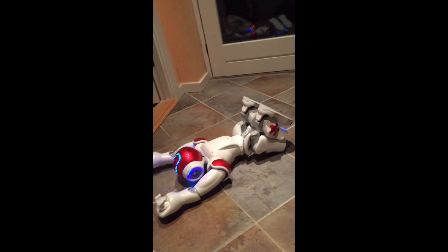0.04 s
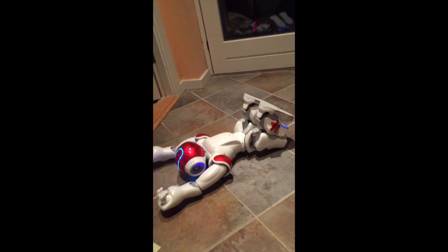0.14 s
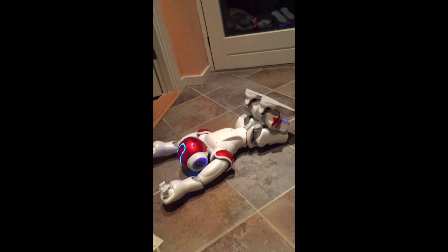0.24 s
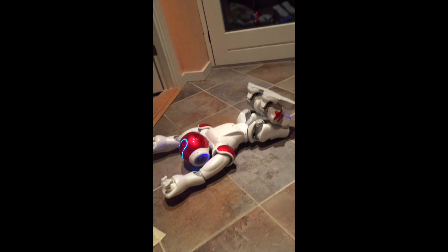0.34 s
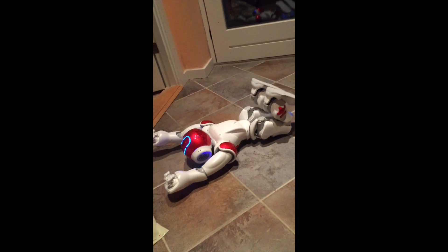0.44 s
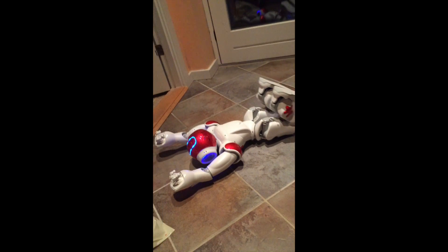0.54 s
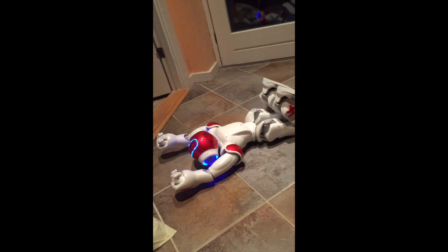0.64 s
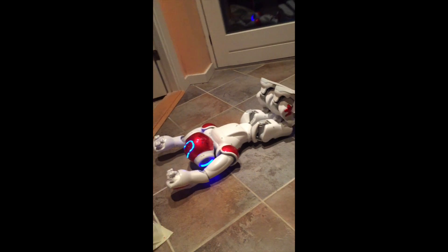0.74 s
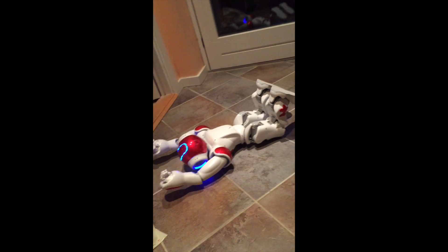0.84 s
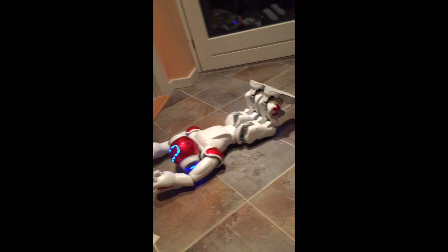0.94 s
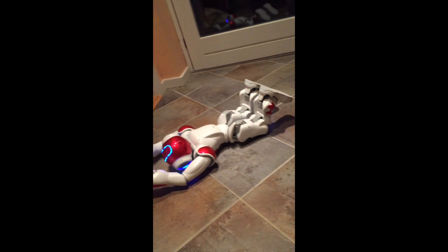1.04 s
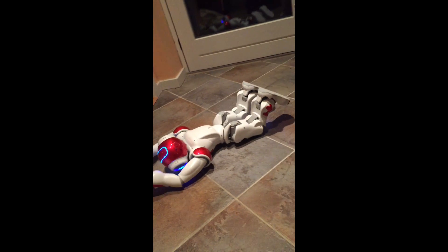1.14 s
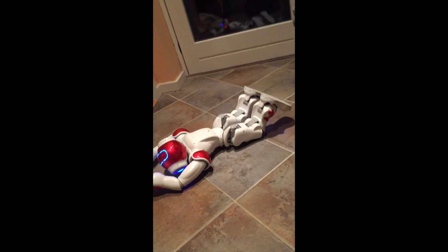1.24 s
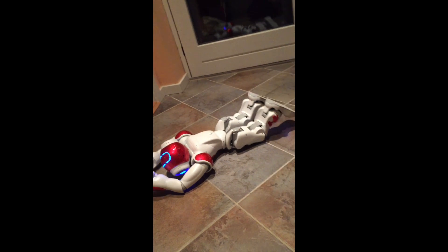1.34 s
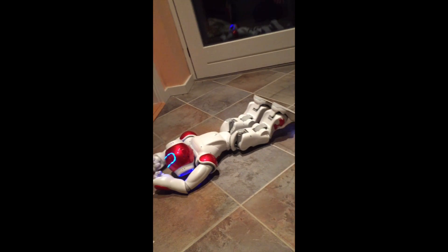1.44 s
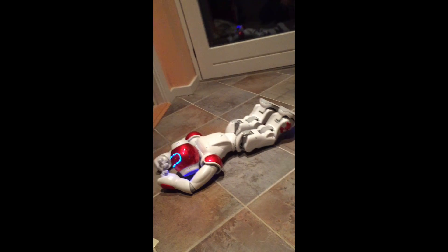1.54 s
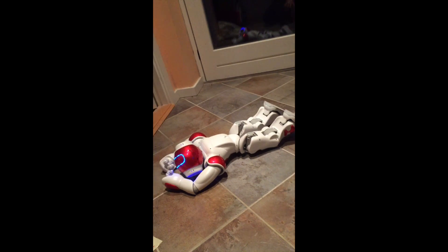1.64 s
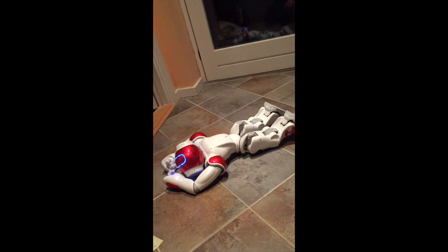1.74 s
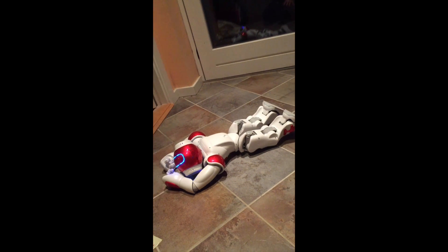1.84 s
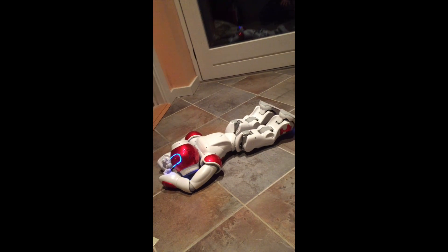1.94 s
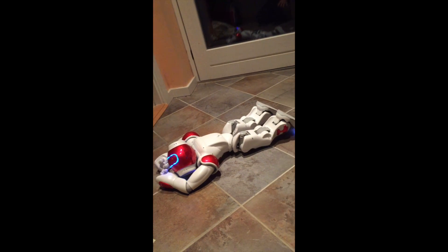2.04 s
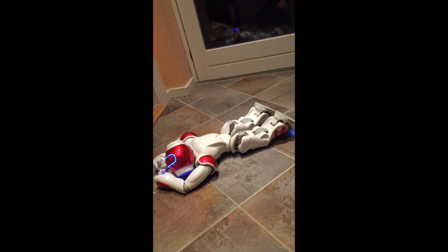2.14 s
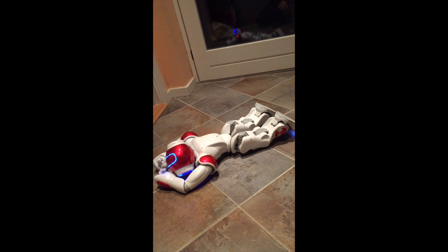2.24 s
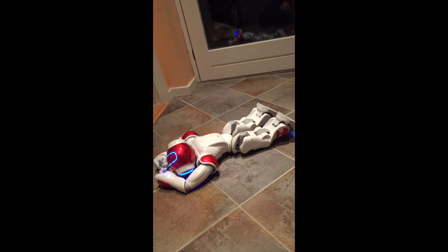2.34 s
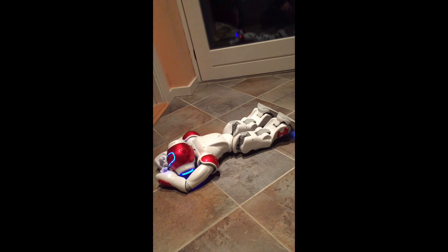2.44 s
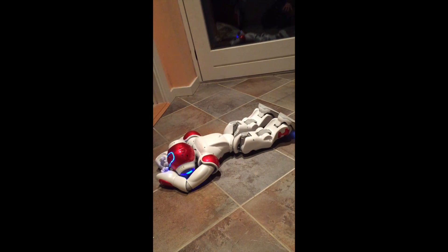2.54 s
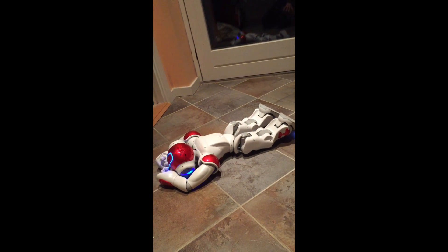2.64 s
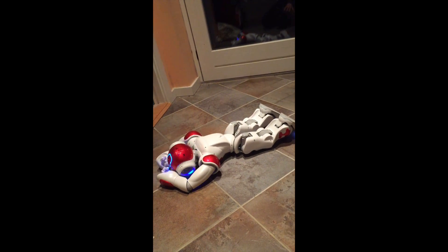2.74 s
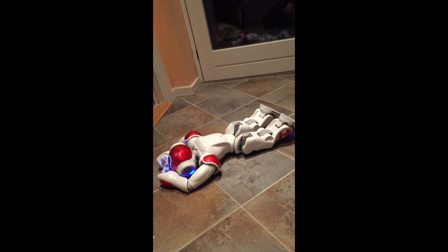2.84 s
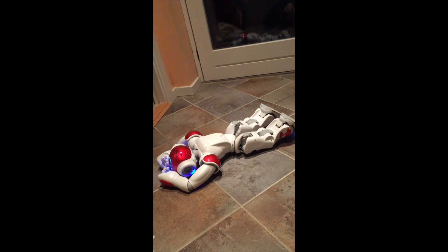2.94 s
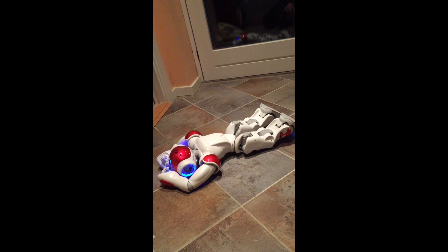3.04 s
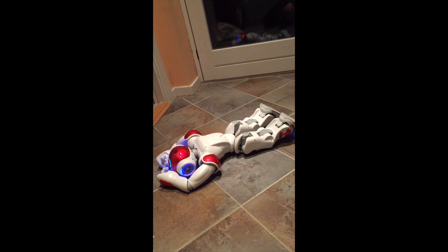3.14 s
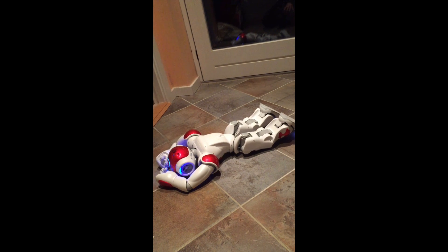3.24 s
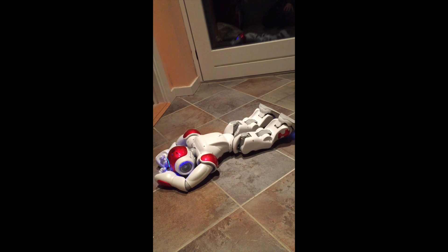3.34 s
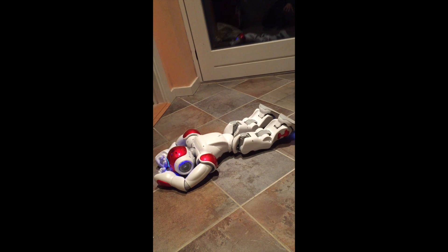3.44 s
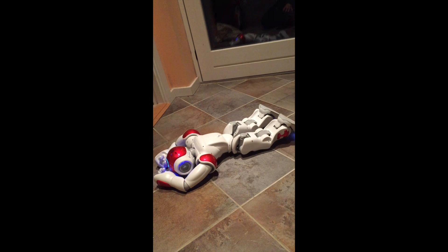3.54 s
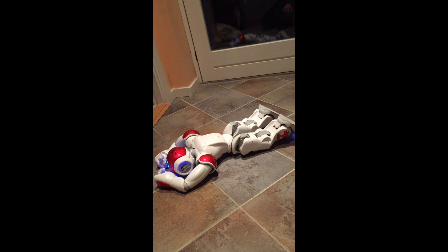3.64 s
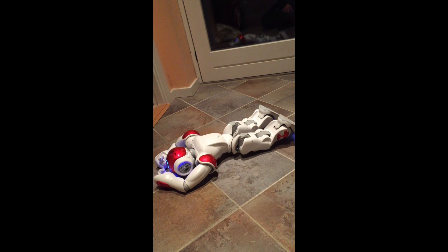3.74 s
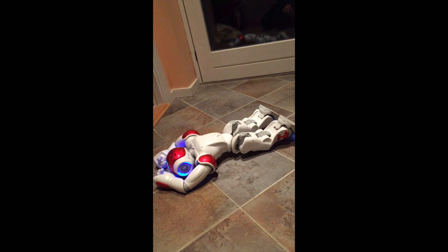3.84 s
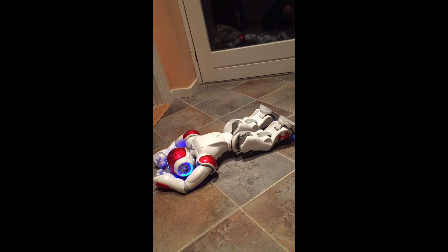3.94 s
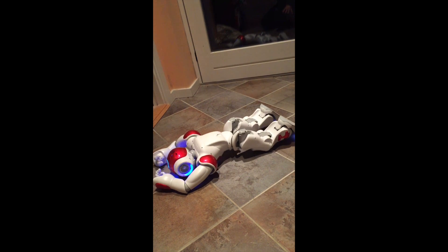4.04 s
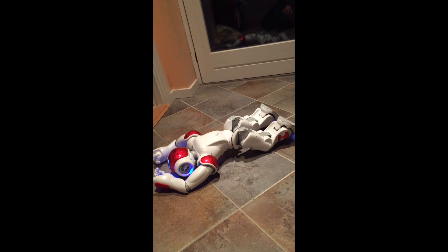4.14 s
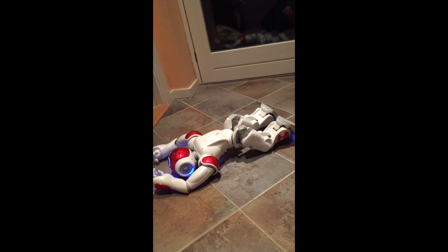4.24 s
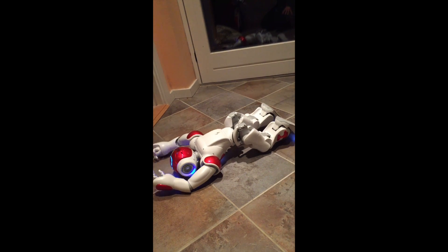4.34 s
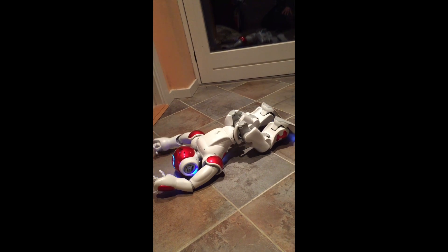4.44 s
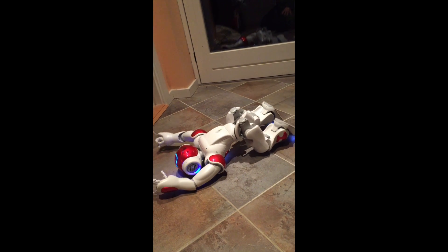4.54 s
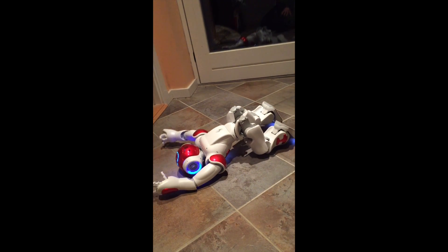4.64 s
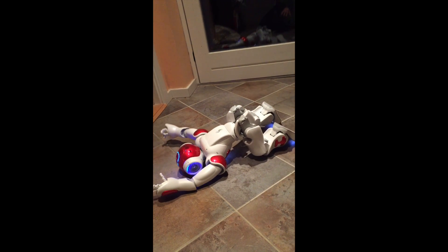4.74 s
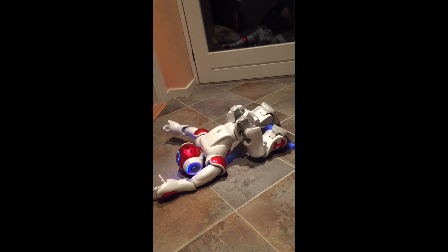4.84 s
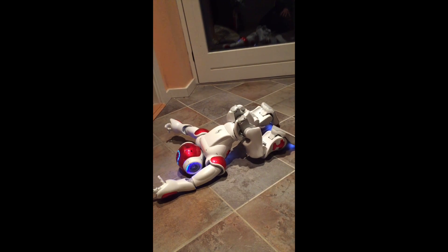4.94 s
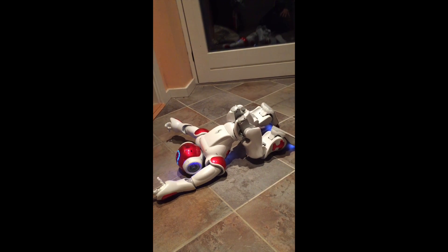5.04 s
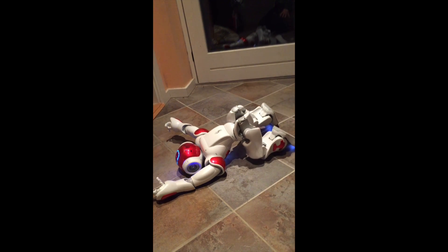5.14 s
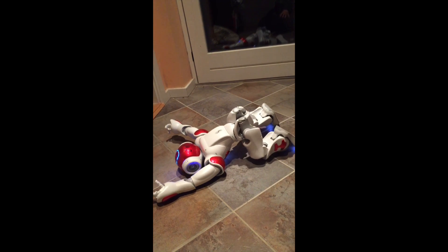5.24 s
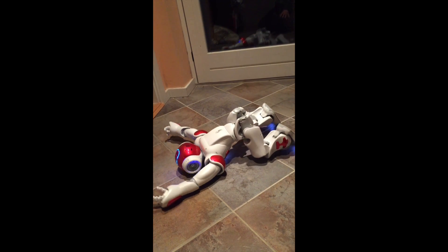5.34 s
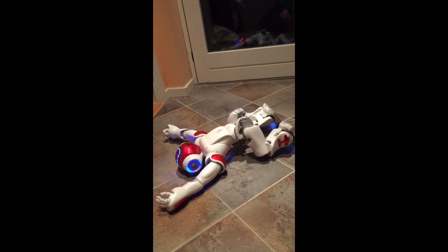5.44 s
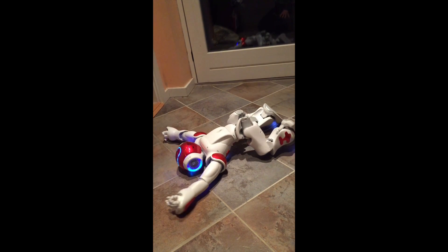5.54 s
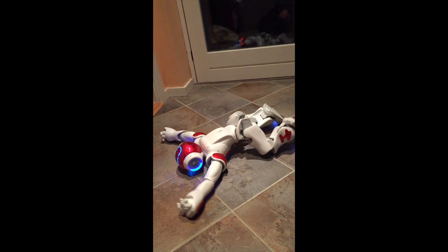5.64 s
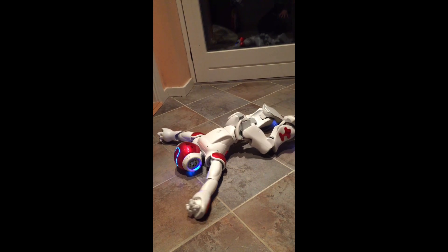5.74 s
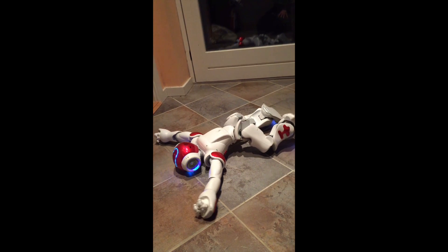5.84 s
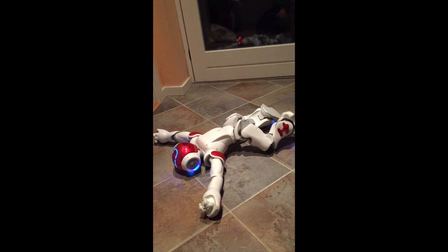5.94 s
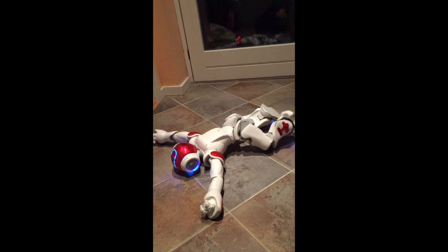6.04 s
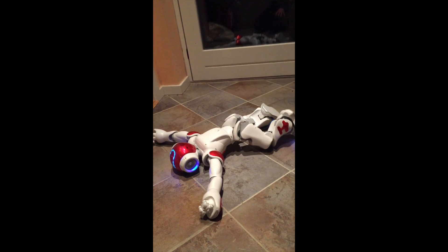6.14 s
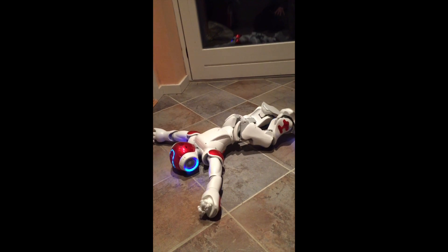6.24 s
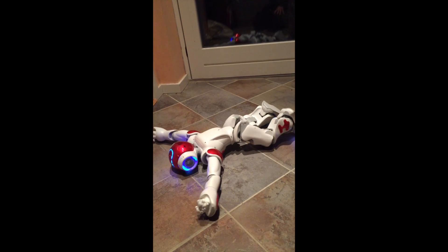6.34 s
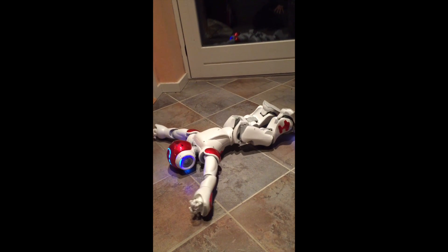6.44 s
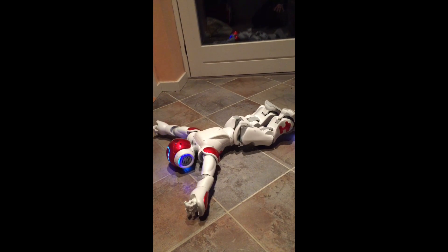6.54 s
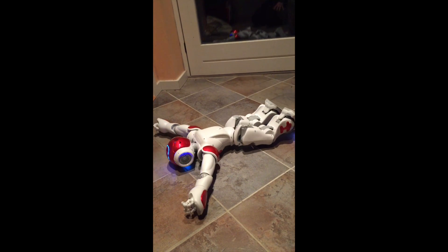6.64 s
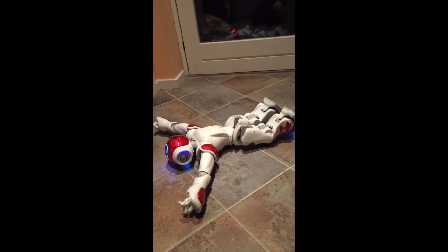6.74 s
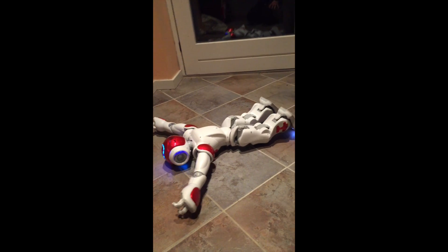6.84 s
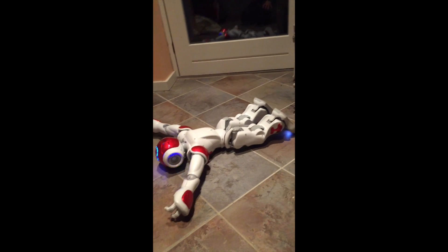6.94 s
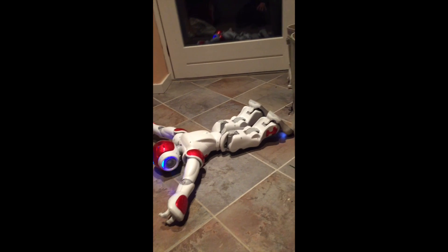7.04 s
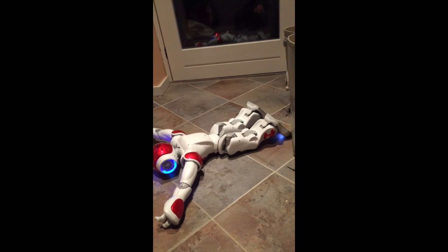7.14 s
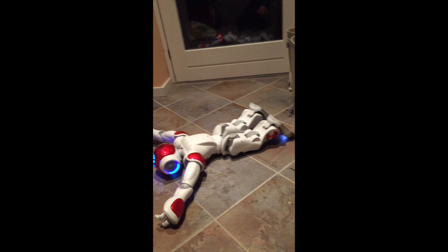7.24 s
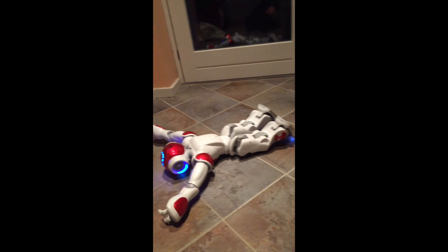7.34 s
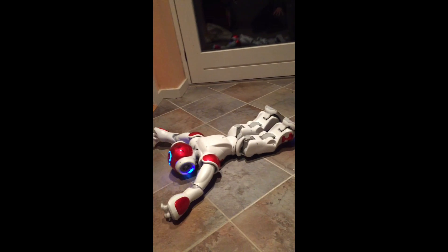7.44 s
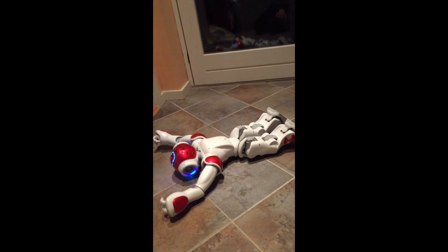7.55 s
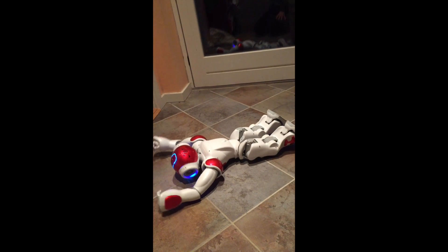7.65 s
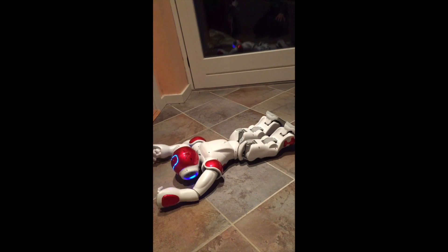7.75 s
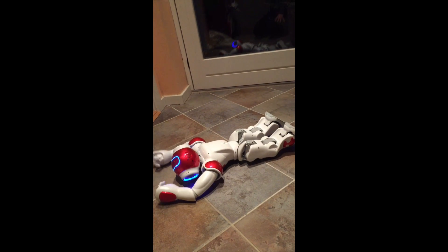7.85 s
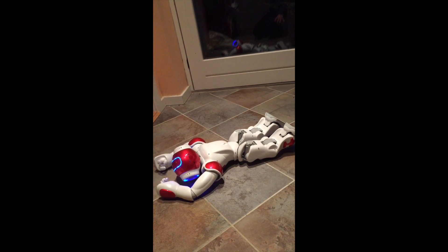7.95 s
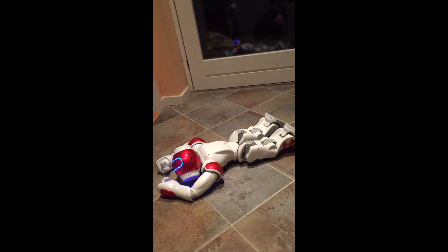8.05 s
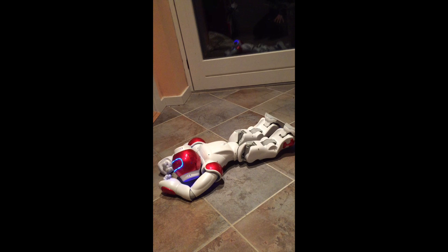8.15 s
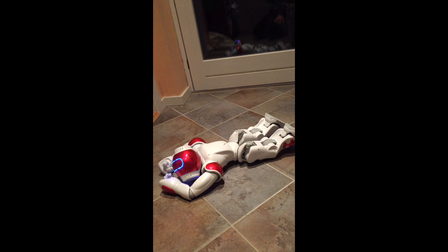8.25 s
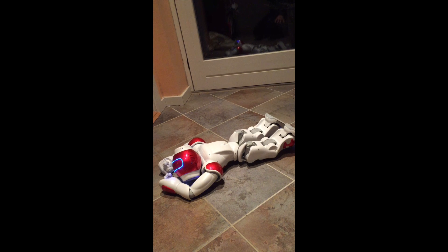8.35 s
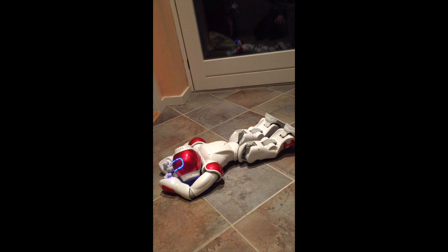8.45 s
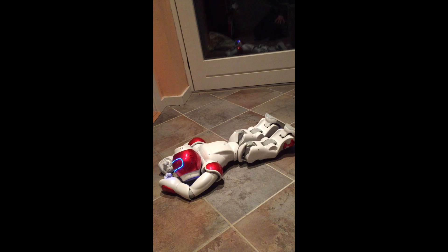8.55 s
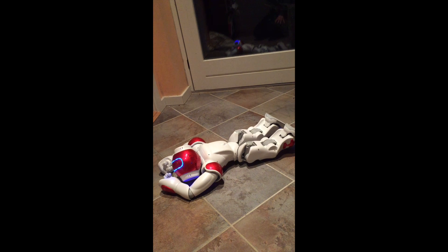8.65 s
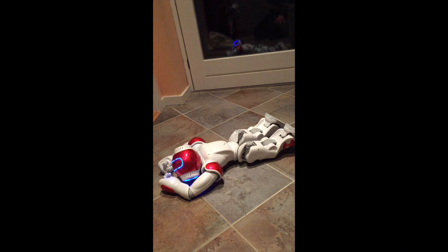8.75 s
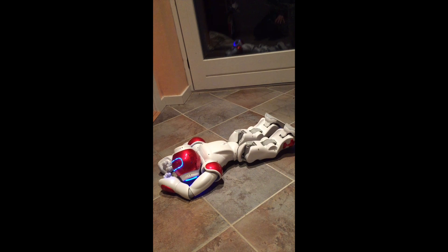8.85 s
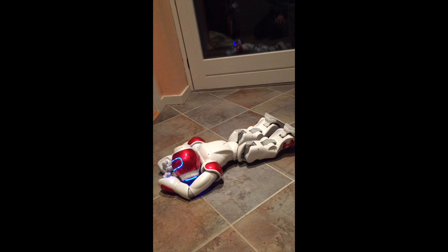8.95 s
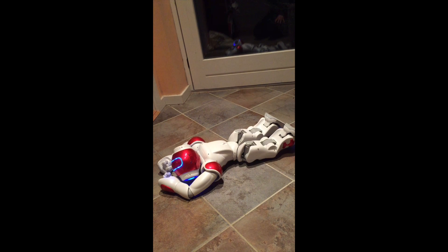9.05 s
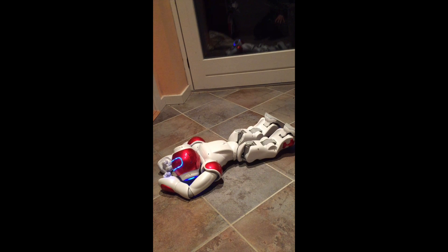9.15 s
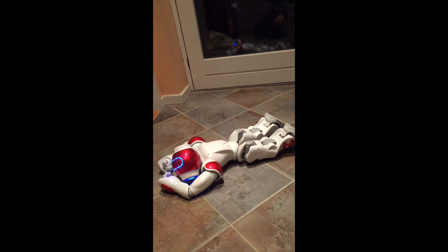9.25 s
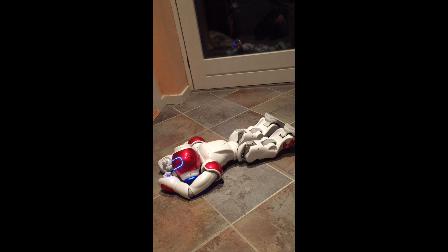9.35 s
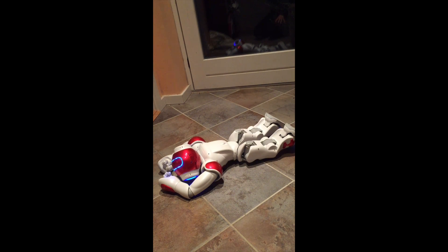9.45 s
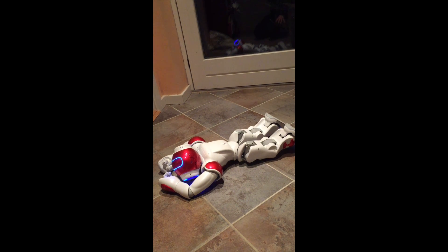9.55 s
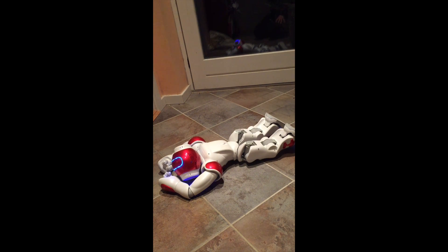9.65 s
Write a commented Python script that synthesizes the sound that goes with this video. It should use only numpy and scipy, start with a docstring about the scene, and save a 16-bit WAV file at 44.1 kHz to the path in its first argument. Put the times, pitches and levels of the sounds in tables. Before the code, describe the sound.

Over a soft steady fan hiss, a small hollow plastic robot lies on tiles and moves its joints. A low bump and short whir lead into a longer gritty motor whir with clacks, then a quieter spell with small knocks. Louder whirring and limb dragging follow, with sharp clacks, a brief squeak and gliding gear whines. Final knocks settle the body. Close microphone, small hard room with short echoes.

```python
"""A low bump, a short motor whir and a dragging limb come first, over the soft hiss of a cooling fan.
A small plastic robot lies on a tile floor in a small hard room and works its joints in repeated spells.
Clicking gear teeth ring its hollow shell as a whir; loaded gears whine as gliding tones, a hand squeaks.
Limbs drag as streams of tiny impacts; clacks and thuds are short bursts that ring shell and limbs.
After the last moves and knocks the body lies still and the fan hisses on."""
import sys
import numpy as np
from scipy import signal
from scipy.fft import rfft, irfft, next_fast_len
from scipy.io import wavfile
from scipy.ndimage import map_coordinates

SR = 44100
rng = np.random.default_rng(int(sys.argv[2]) if len(sys.argv) > 2 else 0)


def output_pcm(signal):
    """Save a mono or channel-first signal as 16-bit PCM at the path in sys.argv[1].

    Samples are clipped to [-1, 1] before scaling.
    """
    pcm = np.clip(np.atleast_2d(signal).T, -1, 1) * 32767
    wavfile.write(sys.argv[1], SR, np.round(pcm).astype(np.int16))


N = 427307
TIME = np.arange(N) / SR


def from_db(db):
    """Turn decibels into a gain."""
    return 10 ** (np.asarray(db) / 20)


def rms_one(x):
    """Scale a sound to unit power."""
    return x / np.sqrt(np.mean(x ** 2) + 1e-20)


def at_hz(points, hz):
    """Read a table between its points, with pitch on a logarithmic scale."""
    table_hz, value = np.transpose(points)
    return np.interp(np.log(hz + 1), np.log(table_hz), value)


def drift(rate):
    """A smooth random curve of spread 1 that takes a new direction about rate times a second."""
    steps = rng.standard_normal(8000)
    return rms_one(np.interp(TIME * rate, np.arange(len(steps)), steps))


def band(x, low, high):
    """Keep only the pitches between low and high."""
    edges = [low, min(high, .45 * SR)]
    return signal.sosfilt(signal.butter(3, edges, "band", fs=SR, output="sos"), x)


def resonate(x, hz, width):
    """One resonance, like a part that rings at one pitch, with gain 1 at its peak."""
    r = np.exp(-np.pi * width / SR)
    feed = np.array([1, 0, -1]) * (1 - r * r) / 2
    feedback = [1, -2 * r * np.cos(2 * np.pi * hz / SR), r * r]
    return signal.lfilter(feed, feedback, x)


def coloured(x, spectrum):
    """Shape how bright or dull a steady sound is with a table; unit power."""
    size = next_fast_len(N)
    gain = from_db(at_hz(spectrum, np.fft.rfftfreq(size, 1 / SR)))
    return rms_one(irfft(rfft(x, size) * gain, size)[:N])


def grains(per_s, spread_db):
    """Tiny impacts of uneven size at random moments; unit power."""
    sizes = from_db(spread_db * np.minimum(rng.exponential(1, N), 4)) * rng.choice([-1, 1], N)
    hits = rng.random(N) < per_s / SR
    return rms_one(sizes * hits)


def stroke(start, rise, fall):
    """Speed of one move, 0 to 1: it eases up to its top and back down to rest."""
    corners = start + np.cumsum([0, rise, fall])
    on = slice(*np.searchsorted(TIME, corners[::2]))
    speed = np.zeros(N)
    speed[on] = np.sin(np.pi / 2 * np.interp(TIME[on], corners, [0, 1, 0]))
    return speed


def levels(moves, power):
    """Level of each layer over time, in dB: it follows speed, and overlapping moves add up."""
    energy = 0
    for start, rise, fall, *dbs in moves:
        energy = energy + np.outer(from_db(dbs) ** 2, stroke(start, rise, fall) ** (2 * power))
    return 10 * np.log10(energy + 1e-10)


def swelling(x, start, length, hz, width):
    """A vibration swells and fades in one resonance; unit power at the top of the swell."""
    load = stroke(start, length / 2, length / 2)
    on = load > 0
    load[on] *= rms_one(resonate(resonate(x[on], hz, width), hz, width))
    return load


def add_at(out, start, sound):
    """Mix a short sound into a layer at its start time."""
    out[int(start * SR):][:len(sound)] += sound


# fan tone, bass to treble: (frequency [Hz], level [dB])
FAN_COLOUR = [(30, -18), (50, 3), (90, -3), (150, -5), (250, -8.5), (450, -11.5), (800, -14), (1200, -15),
              (1700, -13), (2000, -16.5), (3500, -17), (8000, -26), (15800, -30)]
FAN_DB = -61


def fan():
    """Moving air makes steady noise, strongest in the bass and fading towards the treble."""
    return from_db(FAN_DB) * coloured(rng.standard_normal(N), FAN_COLOUR)


# how long the room's echoes take to drop by 60 dB: (frequency [Hz], time [s])
ROOM_DECAY = [(100, 0.45), (500, 0.36), (2000, 0.21), (6000, 0.17), (15000, 0.12)]


def reflections():
    """Dense echoes off tiles and walls, dying sooner in the treble; unit energy."""
    t, tail = TIME[:SR // 2], 0
    edges = 40 * 2 ** np.arange(10)  # octave steps in Hz
    for low, high in zip(edges, edges[1:]):
        t60 = at_hz(ROOM_DECAY, np.sqrt(low * high))
        tail = tail + band(rng.standard_normal(len(t)), low, high) * np.exp(-np.log(1000) * t / t60)
    tail = tail * (t > .005)  # the first echo needs 5 ms to arrive
    return tail / np.linalg.norm(tail)


def room(x, wet_db):
    """Two echo patterns blend in turn, as the reflections shift with the moving limbs and microphone."""
    turn = 2 * np.pi * 1.7 * TIME + drift(4)  # about 1.7 turns a second
    echoes = sum(share * signal.fftconvolve(x, reflections())[:N] for share in (np.cos(turn), np.sin(turn)))
    wet = from_db(wet_db)
    return (x + wet * echoes) / np.hypot(1, wet)


def floor_bounce(x, lag_s, strength):
    """Tiles and body mirror a moving limb: three echoes with changing lags ripple its sound."""
    at, out = np.arange(N), x
    for path in np.sqrt([1, 3, 7]):  # how much longer each path is
        lag = path * lag_s * (1 + .1 * drift(4)) * SR
        out = out + strength * np.interp(at - np.round(lag), at, x)
    return out / np.hypot(1, np.sqrt(3) * strength)


# pitches at which the hollow shell rings: (frequency [Hz], width [Hz], level [dB])
SHELL_MODES = [(538, 102, 7), (987, 76, 1), (1180, 510, -4.5), (1523, 110, -4.5), (1664, 170, -6.5),
               (2060, 510, -16), (2790, 620, -16.5), (3230, 320, -9.5), (3840, 96, -4.5), (4490, 72, -4),
               (5400, 530, -13), (8700, 85, -6), (9260, 45, -6)]


def shell(x, direct, uneven_db=0):
    """The hollow plastic body rings on top of the direct sound; uneven_db varies the mix of its modes."""
    out = direct * x
    for hz, width, db in SHELL_MODES:
        out = out + from_db(db + uneven_db * rng.standard_normal()) * resonate(x, hz, width)
    return out


# a joint snapping against its stop: (time [s], level [dB])
PINGS = [(4.971, -36), (6.03, -62)]
# how its metal parts ring: (frequency [Hz], level [dB], time to drop by 60 dB [s])
PING_MODES = [(4590, 4.5, 0.078), (4580, 1, 0.05), (5211, -6, 0.14), (5696, -14, 0.3), (7350, 2, 0.09),
              (8597, 3, 0.086), (9000, 4, 0.067), (9070, -16, 0.051), (9300, 5, 0.049)]


def pings():
    """Small metal parts ring briefly, as a handful of fading pure tones."""
    out, t = np.zeros(N), TIME[:SR // 4]
    ring = sum(from_db(db - 60 * t / t60) * np.sin(2 * np.pi * hz * t) for hz, db, t60 in PING_MODES)
    for start, db in PINGS:
        add_at(out, start, from_db(db) * ring)
    return out


# low hums of motors and a sliding limb's groan: (start [s], length [s], level [dB], pitch [Hz])
HUMS_AND_GROAN = [(2.538, 0.1, -55, 561), (2.68, 0.24, -65, 553), (2.838, 0.31, -61, 559),
                  (3.02, 0.32, -58.5, 552), (3.361, 0.11, -56, 530), (3.816, 0.038, -49, 537),
                  (4.287, 0.15, -51.5, 280), (7.507, 0.45, -65, 553), (7.578, 0.049, -44.5, 570)]


def hums_and_groan(width_hz=80, throb_db=7.0):
    """Low hums of motors and a sliding limb's groan: each is noise swelling unsteadily in one low resonance."""
    noise, out = rng.standard_normal(N), np.zeros(N)
    for start, length, db, hz in HUMS_AND_GROAN:
        out += from_db(db) * swelling(noise, start, length, hz, width_hz)
    return out * from_db(throb_db * drift(40))


# a hand squeaking on the tile: (start [s], length [s], level [dB])
SQUEAKS = [(5.978, 0.042, -38.5), (6.026, 0.022, -33.5), (6.065, 0.03, -32.5), (6.13, 0.045, -38.5),
           (6.16, 0.041, -41)]
SQUEAK_HZ = 1173


def squeak(jitter=0.02294, wander=0.01006, overtone_db=-17):
    """Plastic sticks and slips on glaze: a rough, nearly steady tone with one overtone."""
    rate = SQUEAK_HZ * (1 + jitter * drift(300) + wander * drift(40))
    phase = 2 * np.pi * np.cumsum(rate) / SR
    tone = np.sin(phase) + from_db(overtone_db) * np.sin(2 * phase)
    swells = sum(from_db(db) * stroke(start, length / 2, length / 2) for start, length, db in SQUEAKS)
    return tone * swells * from_db(2.0 * drift(150))


# single modes set ringing by bumps and clacks; one blow may fill several rows:
# (time [s], level [dB], pitch [Hz])
THUDS = [(0.01, -37, 111.7), (0.088, -31.5, 108), (0.223, -37.5, 101.4), (0.321, -45.5, 560),
         (0.342, -41.5, 108.3), (0.516, -26.5, 1544), (0.613, -42, 119), (1.347, -32.5, 920),
         (1.351, -43.5, 184), (1.857, -27.5, 1142), (1.863, -39, 221), (1.859, -27, 1805),
         (1.871, -38, 366), (2.503, -39, 594), (3.134, -31, 105), (3.208, -37.5, 97.2), (4.787, -43, 284),
         (4.788, -27.5, 930), (4.789, -26.5, 1221), (4.955, -39.5, 347), (5.18, -47, 1310),
         (5.199, -45, 256.5), (5.67, -41, 231), (5.69, -35, 423.6), (5.788, -29, 567), (5.801, -41, 84.8),
         (6.205, -42, 580), (7.969, -41, 208.6), (8.001, -35.5, 101), (8.0, -30.5, 876), (8.03, -41, 810),
         (8.126, -33.5, 286.8), (8.141, -39.5, 142.6), (8.198, -47.5, 199), (8.292, -40, 1230)]
THUD_DECAY_S, THUD_DECAY_POWER = 0.024, 0.47   # decay at 200 Hz; higher modes die sooner


def thuds(rattle=0.89):
    """A bump or clack sets one or more modes ringing, each amid a dull rattle."""
    out, t = np.zeros(N), TIME[:SR // 2]
    for start, db, hz in THUDS:
        decay = THUD_DECAY_S * (200 / hz) ** THUD_DECAY_POWER
        dull = rms_one(band(rng.standard_normal(len(t)), hz * 0.78, hz * 1.236))
        fade = np.exp(-t / decay) * (1 - np.exp(-t / 0.00062))  # starts within about a millisecond
        add_at(out, start, from_db(db) * (np.sin(2 * np.pi * hz * t) + rattle * dull) * fade)
    return out


# plastic hitting tile and gears taking up slack: (time [s], clack level [dB], low knock level [dB],
# treble tilt [dB per octave], first crack relative to the chatter [ratio])
CLACKS = [(0.104, -47, -47, -2, 2.5), (0.5174, -34.5, -56, -8, 0.5), (0.7603, -46, -56, -5.5, -1),
          (1.078, -35.5, -42, -8.5, -0.5), (1.112, -35.5, -56, -8.5, -2), (1.482, -61, -66, 2, 3),
          (1.5854, -42.5, -76, -8, 0), (1.855, -32, -45, -9.5, -0.5), (1.86, -47, -48, -7, 3),
          (2.5005, -46, -45, -5, 0.5), (2.5464, -56, -51.5, -1.5, 2.5), (2.602, -70.5, -65, 5, 3),
          (2.848, -59, -55, -3.5, -2.5), (2.862, -38.5, -51, -5.5, 5.5), (3.119, -40, -59, -7.5, 2),
          (3.125, -44.5, -68, -18, 1), (3.187, -49, -69, -6, 4), (3.291, -55.5, -60, -7, 0),
          (3.379, -62, -62, -8, 1.5), (3.473, -54, -77, -5.5, -0.5), (3.798, -43.5, -47.5, -8.5, -0.2),
          (4.2939, -42, -42, 0.5, 0.5), (4.751, -42, -37.5, -1.5, 1), (4.7876, -34.5, -37.5, -3.5, 1),
          (4.797, -35, -48, -8, 2), (4.9534, -37, -38.5, -2, -0.3), (4.971, -37.5, -49, -0.5, -1),
          (5.196, -45.5, -49, -5, 2), (5.237, -66, -72, 6, 4), (5.521, -52, -49, 0.5, 1),
          (5.6891, -39, -42, -7.5, 3), (5.789, -35, -39, -7, -1), (6.028, -45, -64, -4, 1),
          (6.071, -42, -52, -12, -2), (6.084, -36.5, -39, -11, 1.5), (6.167, -47, -44.5, 0, -0.5),
          (6.465, -54.5, -48, 1.5, 0.5), (7.0148, -62, -76, 7, 1), (7.036, -38, -71, -8.5, 4),
          (7.123, -51.5, -57.5, 0, 1.5), (7.925, -44, -49, -4, -0.5), (7.9826, -47.5, -48, 1.7, 5),
          (7.999, -37.5, -33.5, -8, 1), (8.1229, -41, -49, -11, 0.5), (8.222, -54.5, -65, 2.5, 0.5),
          (8.2922, -49, -64, -10, 4)]
# the knock range, then the three clack ranges: (low edge [Hz], high edge [Hz], decay [s])
CLACK_RANGES = [(647, 1400, 0.018), (1105, 2990, 0.023), (2700, 7200, 0.026), (5930, 14900, 0.026)]
CHATTER_GROWS, TYPICAL_CLACK_DB = 0.068, -36   # dB of longer decay per dB above a typical clack


def clacks(contact_s=0.0015, attack_s=0.00037):
    """A contact and dying chatter of loose parts ring the shell; stronger blows chatter longer."""
    out, t = np.zeros(N), TIME[:SR // 5]
    attack = int(.015 * SR)  # the level is set over the first 15 ms
    centres = np.array([np.sqrt(low * high) for low, high, _ in CLACK_RANGES[1:]])
    octaves = np.log2(centres / centres[0])
    for start, clack_db, knock_db, tilt, crack in CLACKS:
        linger = from_db(CHATTER_GROWS * (clack_db - TYPICAL_CLACK_DB))
        range_dbs = [knock_db, *(clack_db + tilt * octaves)]
        for db, (low, high, decay) in zip(range_dbs, CLACK_RANGES):
            chatter = rng.standard_normal(len(t)) * rng.exponential(1, len(t)) / 2
            contact = crack * np.exp(-t / contact_s)  # over in a few milliseconds
            fade = np.exp(-t / (decay * linger)) * (1 - np.exp(-t / attack_s))
            ring = band(shell(chatter * (contact + fade), direct=.22, uneven_db=4.0), low, high)
            add_at(out, start, from_db(db) * ring / ring[:attack].std())
    return out


# limbs dragging: (start [s], speeding up [s], slowing down [s], floor boom level [dB],
# judder level [dB], grit level [dB])
DRAGS = [(0.0, 0.064, 0.072, -48, -49.5, -89), (0.5, 0.02, .22, -46.5, -51, -92),
         (0.82, 0.15, 0.4, -59, -60, -59.5), (1.22, 0.31, 0.34, -52.5, -57.5, -65),
         (1.78, 0.078, 0.11, -50.5, -57, -58), (3.125, 0.026, 0.09, -43, -46.5, -76),
         (3.2, 0.33, 0.09, -68, -65.5, -67.5), (3.85, 0.31, 0.65, -53, -51, -58.5),
         (4.35, 0.33, 0.38, -45.5, -51.5, -59), (5.17, 0.02, 0.19, -54, -54.5, -62),
         (5.25, 0.2, 0.12, -49.5, -49, -49), (5.42, 0.37, 0.18, -47, -49, -75),
         (5.98, 0.12, 0.16, -51, -54, -53), (6.15, 0.36, 0.2, -54, -57.5, -55.5),
         (6.5, 0.31, 0.48, -56, -66.5, -58.5), (7.44, 0.17, 0.29, -65, -88, -79),
         (7.9, 0.098, 0.48, -56, -68.5, -55)]
DRAG_POWER = 0.93   # loudness grows as this power of a limb's speed
# tone of the floor boom: (frequency [Hz], level [dB])
BOOM_COLOUR = [(30, 6), (45, 8), (62, 5.5), (84, 18), (110, 12), (140, 10), (220, -30.5)]
# tone of the judder over the tiles: (frequency [Hz], level [dB])
JUDDER_COLOUR = [(110, -4), (170, 7), (235, 13.5), (300, -2), (400, -6), (550, -10), (850, 8.5),
                 (1300, -33)]
# tone of the crunching grit: (frequency [Hz], level [dB])
GRIT_COLOUR = [(4000, -0.5), (7000, -0.5), (8700, 0), (10400, -9), (11700, 0.5), (13000, -8), (15500, -2)]


def dragging():
    """Sliding limbs shake the floor, judder over the tiles and crunch fine grit, all as tiny impacts."""
    boom_db, judder_db, grit_db = levels(DRAGS, DRAG_POWER)
    boom = coloured(grains(400, spread_db=-6.5), BOOM_COLOUR)
    judder = coloured(shell(grains(300, spread_db=-1.5), direct=0.11), JUDDER_COLOUR)
    judder = judder * from_db(3 * drift(22))
    grit = coloured(shell(grains(1500, spread_db=-4.0), direct=1.0), GRIT_COLOUR)
    return from_db(boom_db) * boom + from_db(judder_db) * judder + from_db(grit_db) * grit


# gears skipping with a gritty tick: (time [s], level [dB])
SKIPS = [(5.301, -57), (5.354, -48), (5.39, -46), (5.409, -46), (5.9898, -48), (6.01, -46.5), (6.0302, -39),
         (6.04, -42), (6.067, -39.5), (6.0855, -39), (6.102, -43), (6.114, -44), (6.141, -46),
         (6.1626, -46), (6.1751, -40), (6.195, -44), (6.209, -47), (6.2455, -47)]
# what a skip rings with: (frequency [Hz], width [Hz], relative level [dB])
SKIP_MODES = [(5400, 150, -11), (7170, 270, 0), (8660, 990, 1.5), (9570, 130, 4), (11200, 300, -6),
              (12000, 300, -5), (12800, 490, -4), (14700, 500, -1)]
SKIP_DECAY_S = .009


def skips(uneven_db=3.0):
    """Each skip is a short burst of chatter that wakes the gear's bright modes in its own mix."""
    out, t = np.zeros(N), TIME[:SR // 10]
    for start, db in SKIPS:
        force = rng.standard_normal(len(t)) * np.exp(-t / SKIP_DECAY_S)
        ring = 0
        for hz, width, level in SKIP_MODES:
            ring = ring + from_db(level + uneven_db * rng.standard_normal()) * resonate(force, hz, width)
        add_at(out, start, from_db(db) * ring / ring[:len(t) // 10].std())  # level over the first 10 ms
    return out


TICKS_PER_S, TICKS_DB = 9.9, -32.5   # level relative to the whir


def ticks(low_hz=1200, high_hz=12000):
    """Stray ticks of backlash, the play between gear teeth, while the joints turn."""
    whir_db, _ = motor_levels()
    rung = shell(grains(TICKS_PER_S, spread_db=-4.0), direct=0.21)
    return from_db(whir_db + TICKS_DB) * rms_one(band(rung, low_hz, high_hz))


# arm motors' brushes sizzling: (start [s], speeding up [s], slowing down [s], level [dB])
BRUSHES = [(5.27, 0.11, 0.27, -71), (6.22, 0.33, 0.6, -55), (7.38, 0.31, .45, -56)]
# tone of the sizzle: (frequency [Hz], level [dB])
SIZZLE_COLOUR = [(5000, -28), (7600, -7), (8400, -3.5), (9900, -3), (10400, -9), (12200, -6), (12900, -4),
                 (13600, -4), (14000, 0), (14600, -6), (15200, -11), (16000, -2)]


def brushes():
    """Brushes spark on the motors' spinning contacts: thousands of tiny high ticks a second."""
    sizzle_db, = levels(BRUSHES, MOTOR_POWER)
    return from_db(sizzle_db) * coloured(grains(4600, spread_db=3.5), SIZZLE_COLOUR)


# teeth grinding under a surge of load: (start [s], length [s], level [dB], housing resonance [Hz])
GRINDS = [(0.696, 0.39, -51, 2100), (1.068, 0.029, -37.5, 1500), (1.12, 0.025, -35.5, 1510),
          (1.243, 0.045, -36, 1510), (1.23, 0.094, -43, 2700), (1.389, 0.077, -48, 2640),
          (1.601, 0.047, -42, 1360), (3.006, 0.033, -57, 5400), (3.993, 0.06, -52, 1400),
          (4.1, 0.4, -48.5, 1370), (4.17, 0.18, -46, 2035), (4.371, 0.13, -54, 2570),
          (5.251, 0.12, -52, 1147), (5.392, 0.17, -45, 1564), (7.475, 0.19, -49, 1570),
          (7.545, 0.32, -50.5, 3730)]
GRIND_Q = 6.3   # resonance pitch divided by its width


def grinds(throb_db=2.0):
    """Binding teeth chatter in coarse pulses and ring the housing of their joint."""
    chatter = grains(1500, spread_db=1.5) * from_db(throb_db * drift(70))
    out = np.zeros(N)
    for start, length, db, hz in GRINDS:
        out += from_db(db) * swelling(chatter, start, length, hz, hz / GRIND_Q)
    return out


# gear trains that sing out: (start [s], swell [s], fade [s], tooth rate at the top of the swell [Hz],
# glide [Hz per s], level [dB], boost of harmonics above the third [dB])
WHINES = [(1.101, 0.15, 0.14, 512, 158, -55, 13), (1.3, 0.11, 0.21, 414, -300, -47, 7),
          (2.551, 0.38, 0.26, 492, 22, -64, -4), (6.385, 0.053, 0.077, 597, 350, -41.5, -16),
          (6.409, 0.041, 0.059, 454, 352, -43.5, -6), (6.479, 0.052, 0.048, 539, -120, -43, -6),
          (6.72, 0.052, .07, 678.3, -100, -49, -6), (6.47, 0.046, 0.15, 686, 10, -47.5, 3),
          (6.549, 0.12, 0.069, 562, 485, -38, -1), (6.68, 0.11, 0.18, 546.3, -130, -35, -4),
          (6.841, 0.066, 0.058, 687, -21, -40.5, 1), (6.869, 0.075, 0.22, 450.5, -480, -48, 6),
          (6.881, 0.093, 0.18, 565, -240, -43.5, -2.5), (7.305, 0.021, 0.043, 518.6, -450, -52, -16),
          (7.47, 0.19, 0.11, 700, 498, -51, 11), (7.56, 0.12, 0.086, 491, 195, -46, 16),
          (7.83, 0.085, 0.18, 496, -300, -50, 8)]
# harmonics of the tooth rate: (multiple [1], relative level [dB])
TOOTH_HARMONICS = [(1, -69), (2, -24), (3, 1.5), (5, -11), (6, -12.5), (7, -23), (8, -19)]


def whine(start, rise, fall, hz, glide, db, upper_db):
    """A loaded gear sings at its gliding tooth rate; uneven wheels make it flutter and throb."""
    flutter, waver, throb_db = .012, .009, 2  # fast and slow pitch spread (shares), loudness spread
    load = stroke(start, rise, fall)
    on = load > 0
    rate = (hz + glide * (TIME - start - rise)) * (1 + flutter * drift(130) + waver * drift(35))
    phase = 2 * np.pi * np.cumsum(rate[on]) / SR
    harmonics = sum(from_db(level + upper_db * (k > 3)) * np.sin(k * phase) for k, level in TOOTH_HARMONICS)
    tone = np.zeros(N)
    tone[on] = rms_one(harmonics)
    return tone * load * from_db(db + throb_db * drift(110))


def gear_teeth(speed, top_hz, wander=.05, uneven_db=3.0, backlash=.02):
    """One click per meshing tooth, each of its own strength; backlash blurs the high harmonics."""
    teeth = np.cumsum(top_hz * speed * (1 + wander * drift(9) + backlash * drift(250))) / SR
    clicks = np.diff(np.floor(teeth), prepend=0)
    return rms_one(clicks * from_db(uneven_db * rng.standard_normal(N)))


POSE_SHIFT = 0.045   # typical share by which the pitch slides


def bending(x):
    """As the pose changes, all resonances of the body slide up and down together with the sound."""
    at = np.arange(N) + np.cumsum(POSE_SHIFT * drift(12))
    return map_coordinates(x, [at], order=3, mode="mirror")


# joint moves, levels before the shell and gearbox settings: (start [s], speeding up [s],
# slowing down [s], whir level [dB], tooth rasp level [dB], gearbox resonance [Hz], top tooth rate [Hz])
MOVES = [(0.0, 0.014, 0.24, -53, -56, 1900, 375), (0.421, 0.44, 0.55, -46, -50, 1640, 428.6),
         (0.9, 0.33, .58, -42.5, -50.5, 1550, 391), (1.0, 0.39, .42, -49, -79, 3220, 526),
         (2.42, 0.57, .52, -58, -63, 2132, 358), (3.8, 0.33, .3, -47.5, -52, 1520, 333),
         (3.899, 0.59, .5, -46, -47, 2280, 450), (3.92, 0.56, 0.52, -53, -55, 5150, 477),
         (3.919, 0.47, 0.5, -57, -56, 6400, 413), (4.3, 0.36, .42, -45.5, -56, 1730, 306),
         (5.18, 0.33, 0.52, -46, -45, 1860, 358.7), (5.87, 0.31, 0.37, -47.5, -48, 1396, 420),
         (6.15, 0.47, 0.52, -44.5, -47, 1879, 340), (6.3, 0.52, 0.46, -49, -52, 4260, 551.5),
         (7.3, 0.058, .18, -60, -57, 1899, 435.5), (7.36, 0.3, 0.36, -47, -46.5, 1952, 492.3),
         (7.451, 0.32, .35, -51.5, -65, 4550, 473), (7.68, .26, 0.43, -48.5, -48, 3070, 390)]
MOTOR_POWER = 1.35   # loudness grows as this power of a joint's speed


def motor_levels():
    """Whir and tooth rasp of all joints together, in dB."""
    return levels([move[:-2] for move in MOVES], MOTOR_POWER)


GEARBOX_DB, GEARBOX_WIDTH_HZ = -3, 1170   # level relative to the joint's whir
GLIDE_POWER = 0.6   # a gearbox's pitch grows as this power of its stroke
HUNTING = 0.06   # typical share by which a servo's speed swings about its aim


def gearboxes(rattle):
    """Each moving joint adds gear tones that glide with its speed, and rings in its own gearbox."""
    gear_share = 1.8  # gear clicks against the common rattle
    out = np.zeros(N)
    for start, rise, fall, whir_db, _, hz, tooth_hz in MOVES:
        speed = stroke(start, rise, fall)
        on = speed > 0
        teeth = gear_teeth(speed ** GLIDE_POWER, tooth_hz, wander=HUNTING, uneven_db=2.0, backlash=.026)[on]
        drive = rattle[on] + gear_share * rms_one(teeth)
        ring = rms_one(resonate(resonate(drive, hz, GEARBOX_WIDTH_HZ), hz, GEARBOX_WIDTH_HZ))
        out[on] += from_db(whir_db + GEARBOX_DB) * speed[on] ** MOTOR_POWER * ring
    grinding = out * from_db(1.6 * drift(55))
    return floor_bounce(grinding, lag_s=.0019, strength=.6)


# tone of the whir: (frequency [Hz], level [dB])
WHIR_COLOUR = [(450, -46), (800, -4), (1150, 4.5), (1600, 3.5), (2200, 7.5), (2900, 1.5), (3800, -52),
               (6000, -62), (12000, -72)]
# tone of the brighter tooth rasp: (frequency [Hz], level [dB])
RASP_COLOUR = [(2000, -9.5), (3000, 1), (3800, 0), (4800, -6), (6200, -9.5), (8000, -19.5), (12000, -22)]
HOLD_DB, RELAX_S = -61, 8.45   # a faint buzz, before the shell, holds the pose until the motors relax


def motors():
    """Several gearboxes run together; the faster they turn, the louder they whir and rasp."""
    whir_db, rasp_db = motor_levels()
    speed = from_db(.2 * (whir_db - whir_db.max()))  # worked back from the loudness
    teeth = rms_one(sum(gear_teeth(speed, hz) for hz in (129.7, 200.9, 288.7, 415.9, 554.8)))
    rattle = bending(shell(teeth + 0.83 * grains(1200, spread_db=-1.0), direct=0.68))
    rattle = rattle * from_db(1.27 * drift(45) + 1.0 * drift(11))
    rattle = floor_bounce(rattle, lag_s=.0016, strength=0.43)
    hold = from_db(HOLD_DB) * np.clip((RELAX_S - TIME) / 0.24, 0, 1)
    whir = np.hypot(from_db(whir_db), hold) * coloured(rattle, WHIR_COLOUR)
    rasp = from_db(rasp_db) * coloured(rattle, RASP_COLOUR)
    through_shell = .75
    return through_shell * (whir + rasp) + gearboxes(rattle)


def scene():
    """The robot in its room, over the steady fan."""
    moving = motors() + grinds() + brushes() + ticks() + skips() + hums_and_groan()
    body = moving + dragging() + clacks() + thuds()
    tones = sum(whine(*row) for row in WHINES) + squeak() + pings()
    return (room(body, wet_db=-11.5) + room(tones, wet_db=-11) + fan())[None]


CUTOFF_HZ = 15950


def record(dry):
    """A small microphone loses the deepest bass; the top is cut steeply."""
    thin = signal.sosfilt(signal.butter(4, 35, "high", fs=SR, output="sos"), dry)
    return signal.sosfilt(signal.ellip(12, .1, 80, CUTOFF_HZ, fs=SR, output="sos"), thin)


dry = scene()
out = record(dry)
output_pcm(out)
```